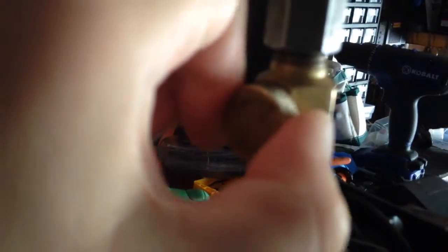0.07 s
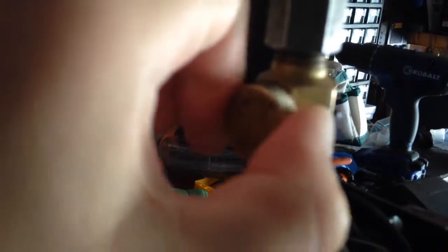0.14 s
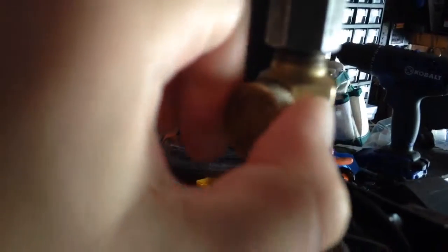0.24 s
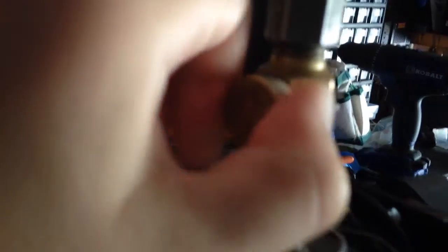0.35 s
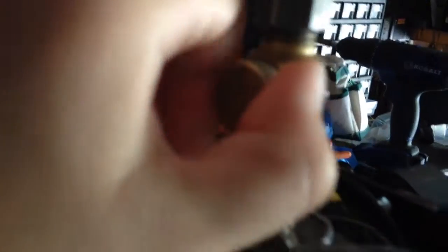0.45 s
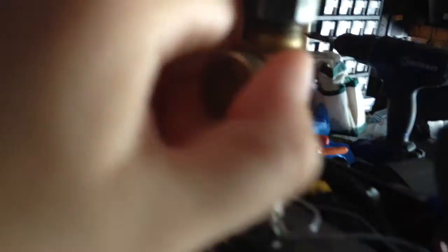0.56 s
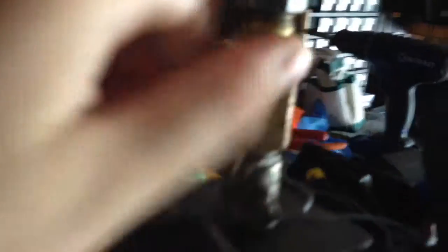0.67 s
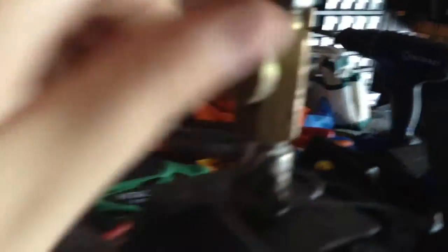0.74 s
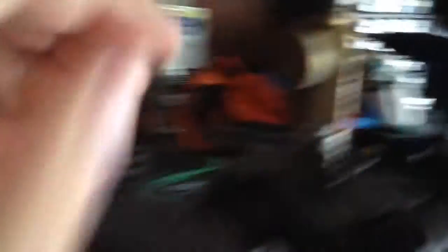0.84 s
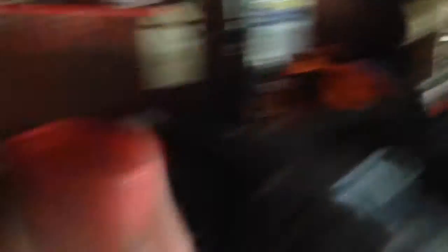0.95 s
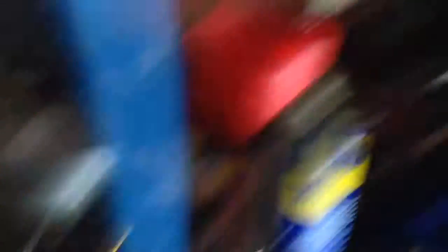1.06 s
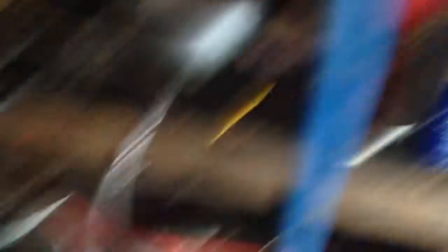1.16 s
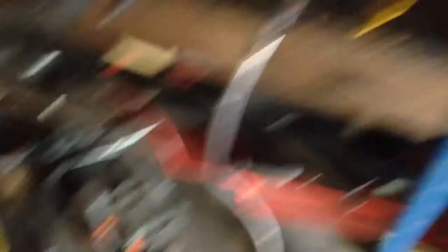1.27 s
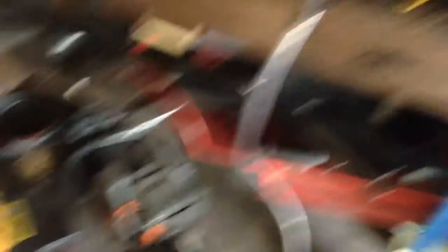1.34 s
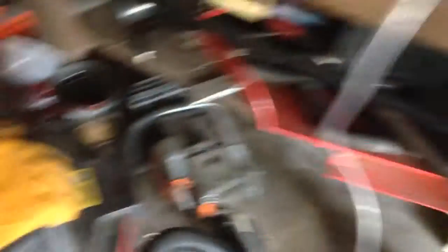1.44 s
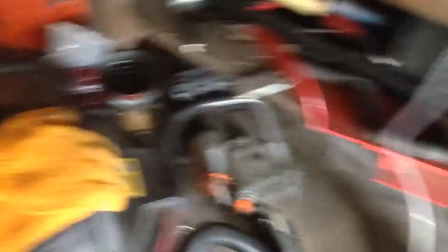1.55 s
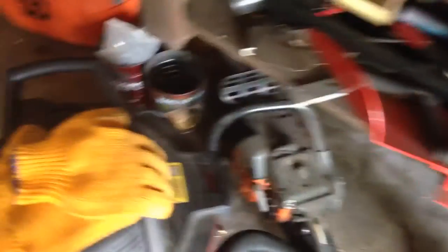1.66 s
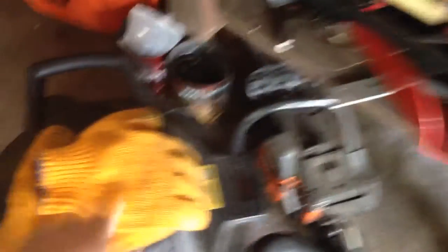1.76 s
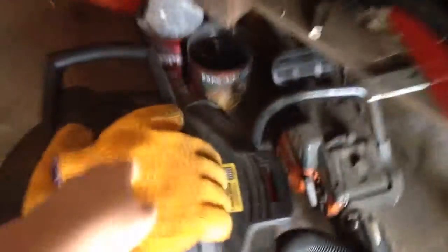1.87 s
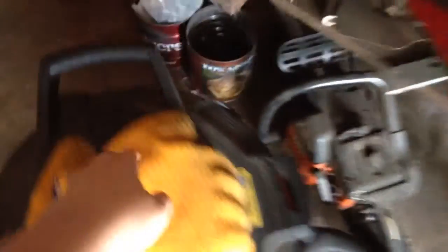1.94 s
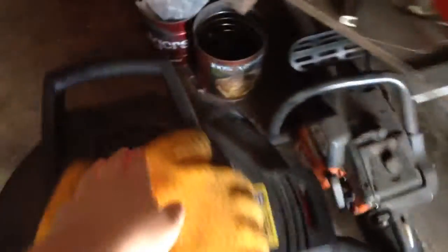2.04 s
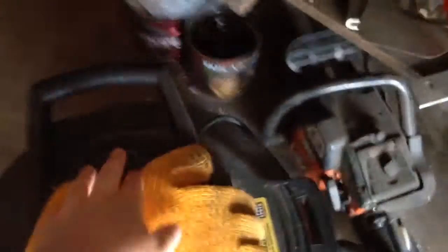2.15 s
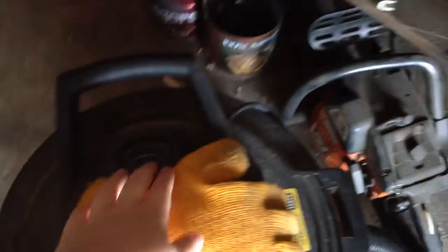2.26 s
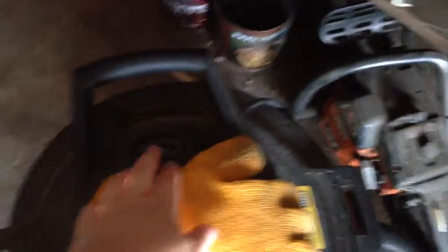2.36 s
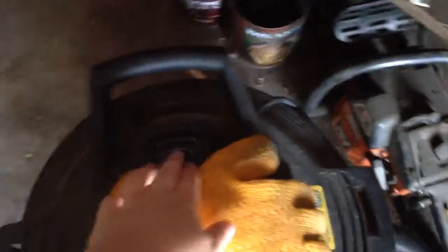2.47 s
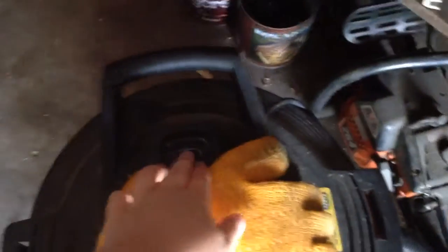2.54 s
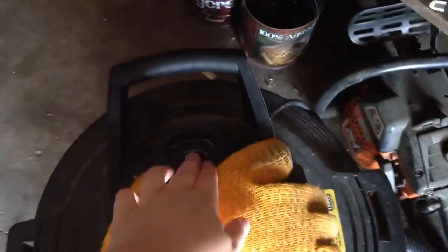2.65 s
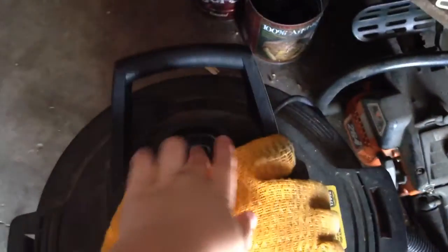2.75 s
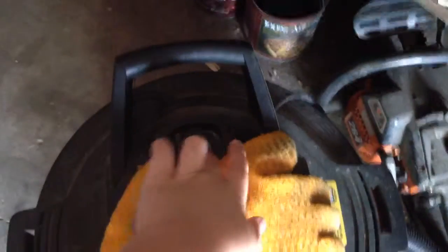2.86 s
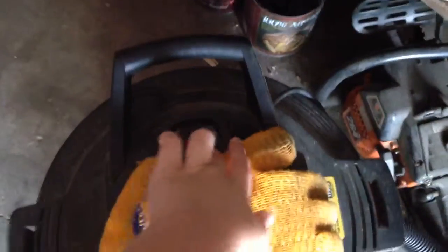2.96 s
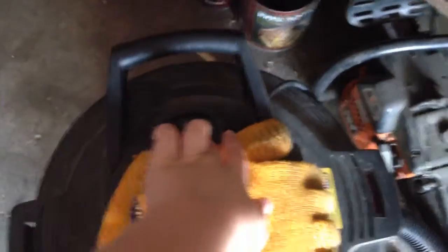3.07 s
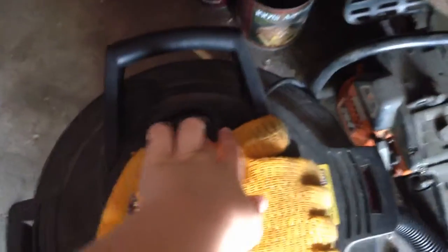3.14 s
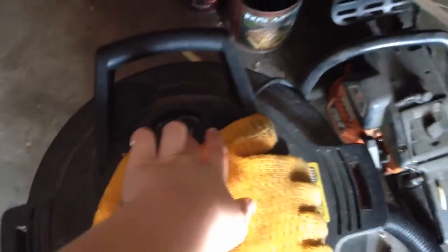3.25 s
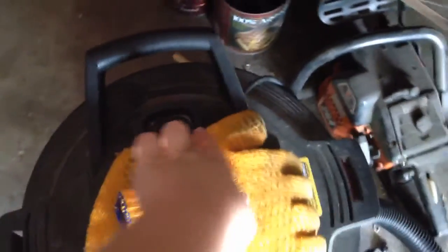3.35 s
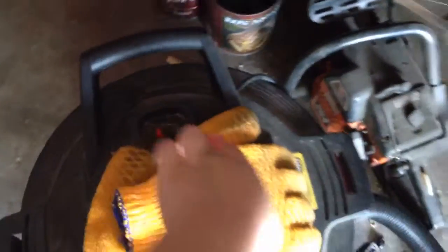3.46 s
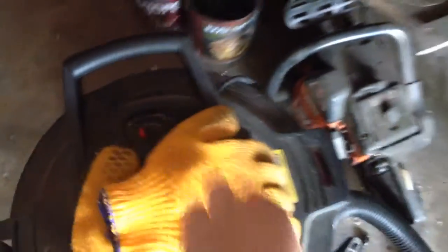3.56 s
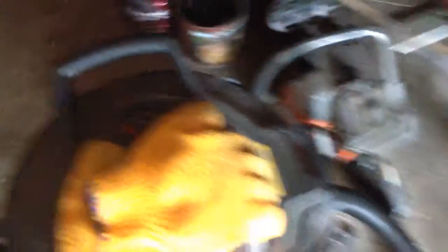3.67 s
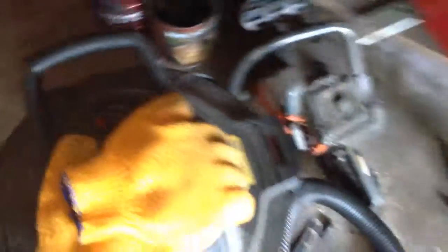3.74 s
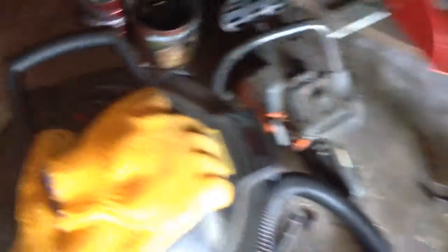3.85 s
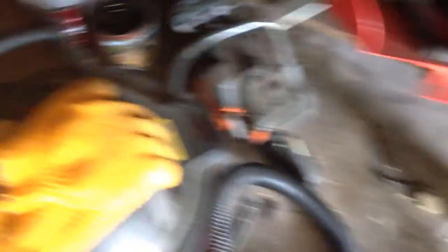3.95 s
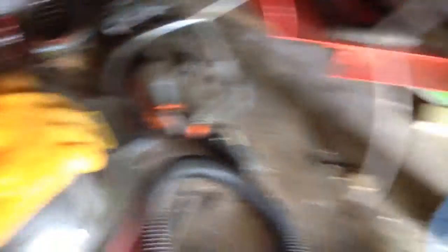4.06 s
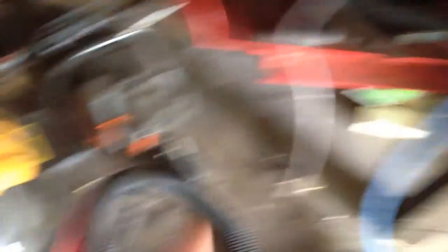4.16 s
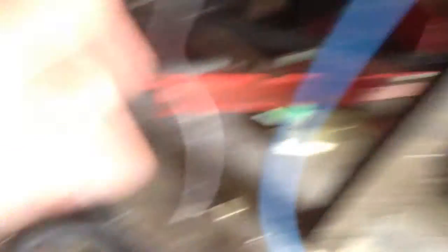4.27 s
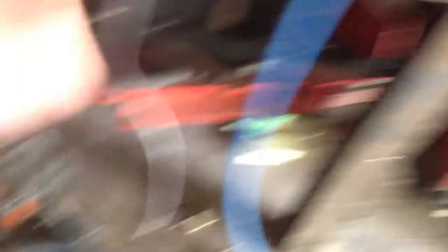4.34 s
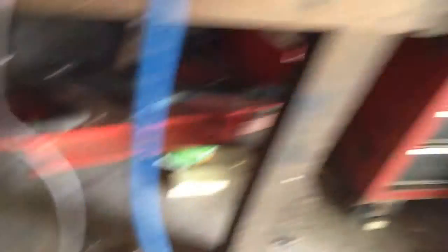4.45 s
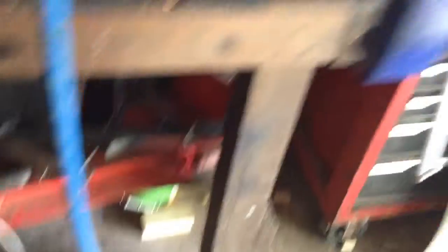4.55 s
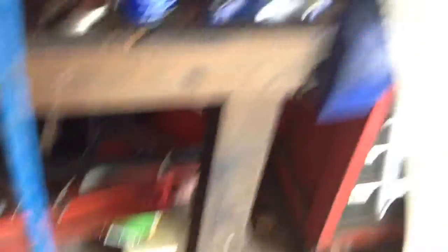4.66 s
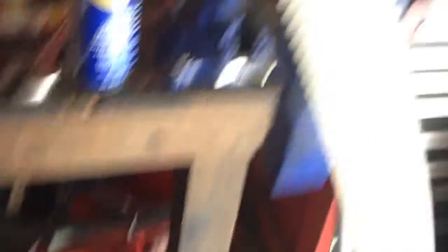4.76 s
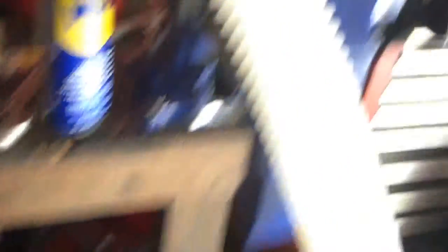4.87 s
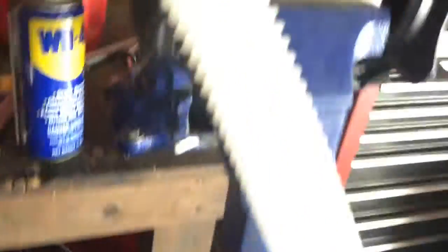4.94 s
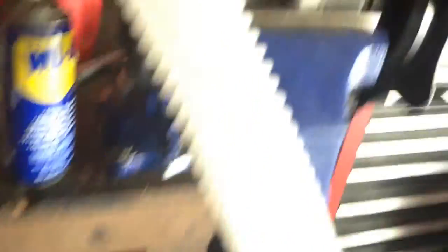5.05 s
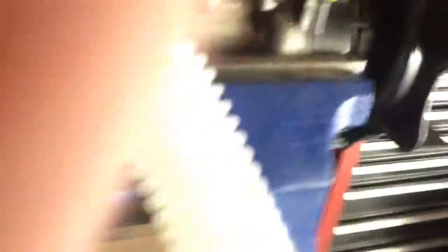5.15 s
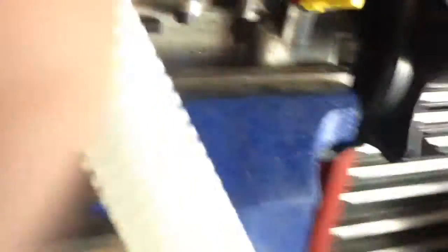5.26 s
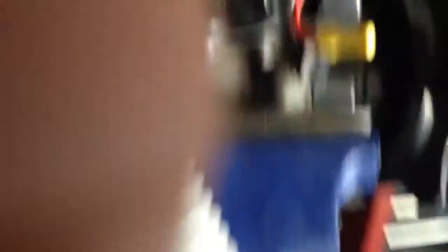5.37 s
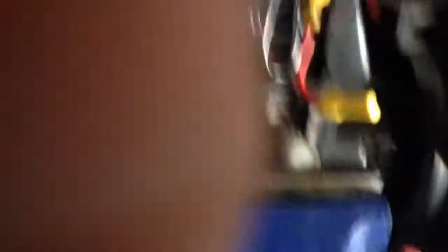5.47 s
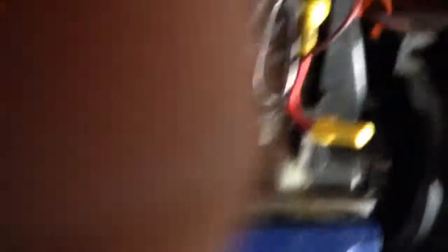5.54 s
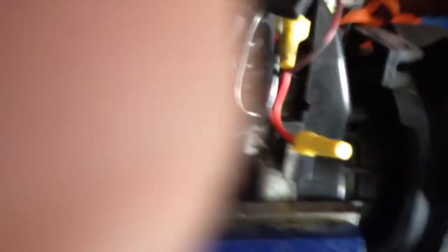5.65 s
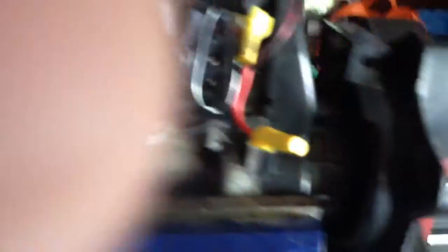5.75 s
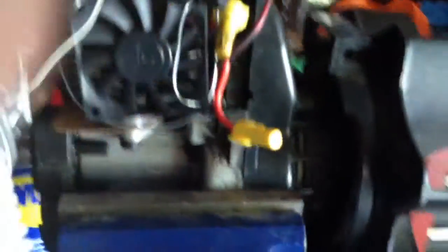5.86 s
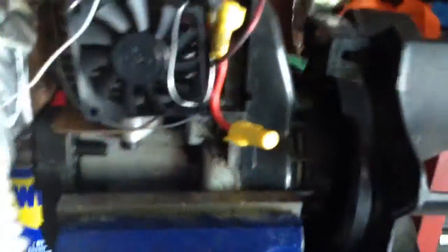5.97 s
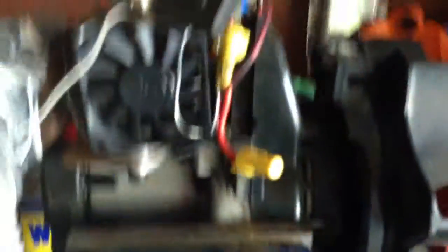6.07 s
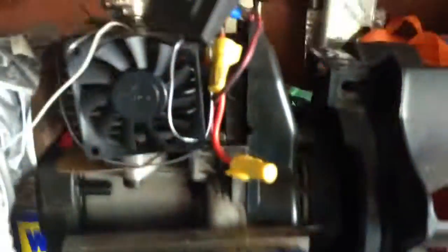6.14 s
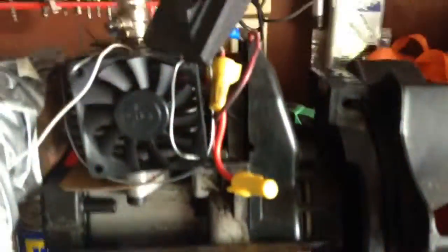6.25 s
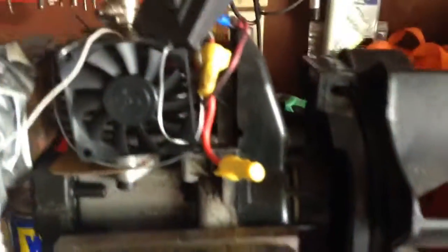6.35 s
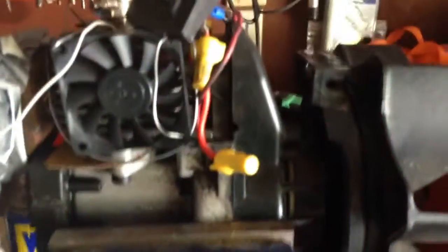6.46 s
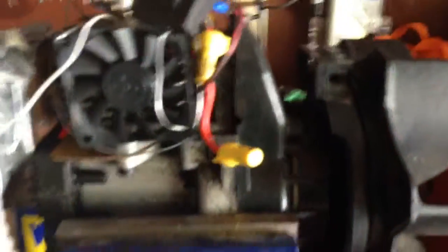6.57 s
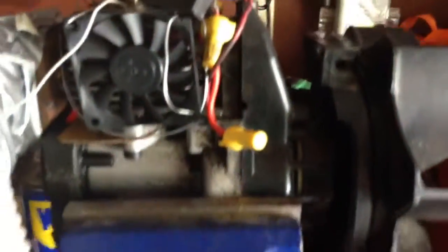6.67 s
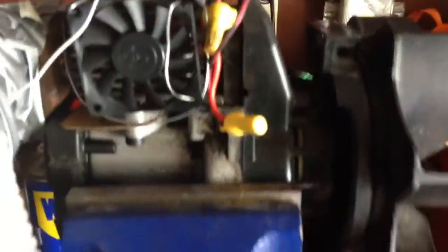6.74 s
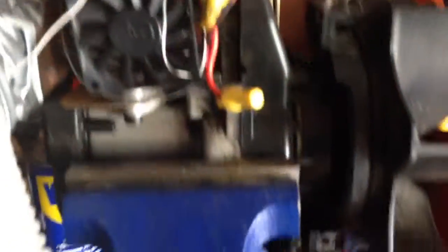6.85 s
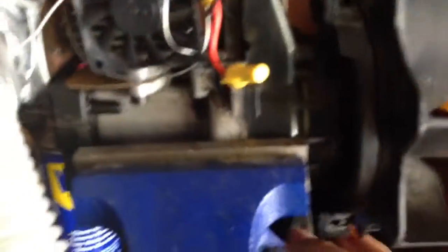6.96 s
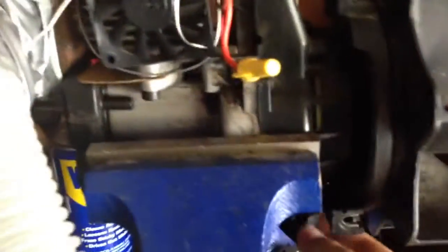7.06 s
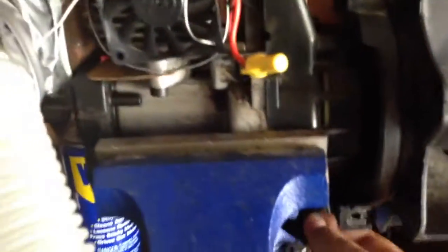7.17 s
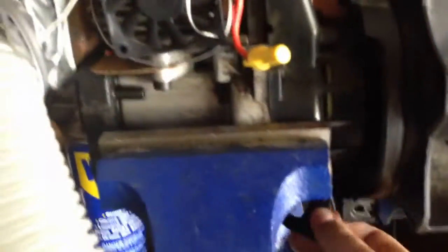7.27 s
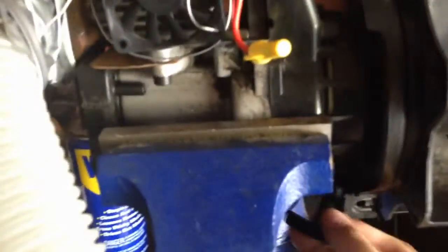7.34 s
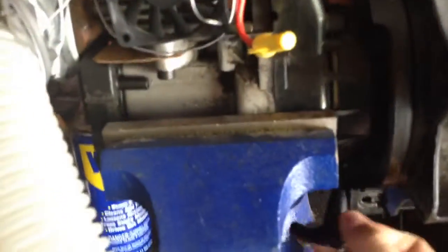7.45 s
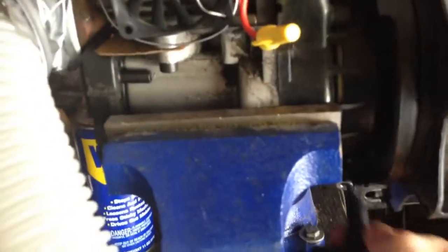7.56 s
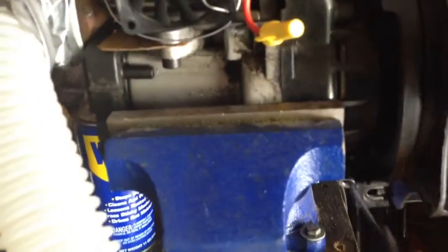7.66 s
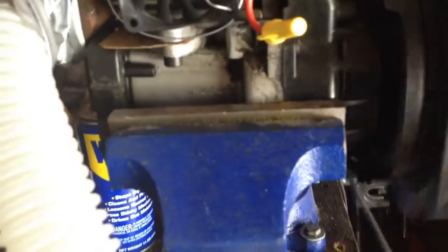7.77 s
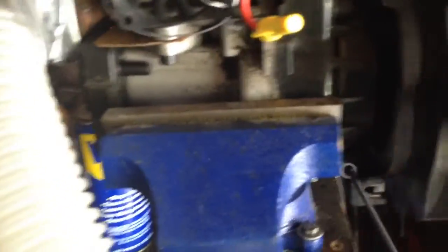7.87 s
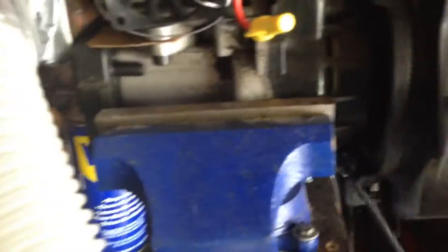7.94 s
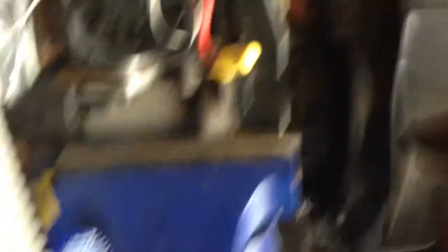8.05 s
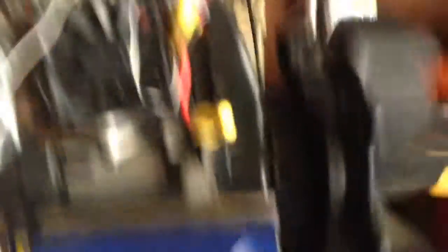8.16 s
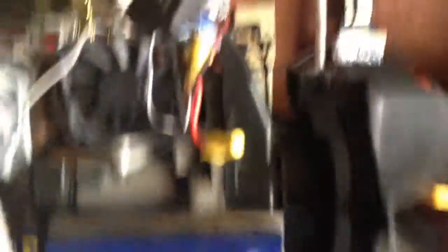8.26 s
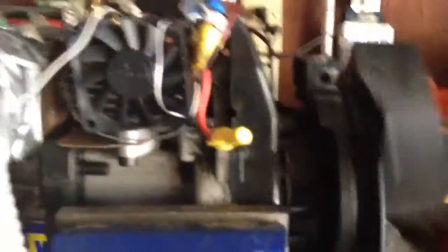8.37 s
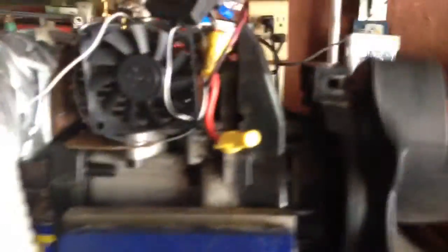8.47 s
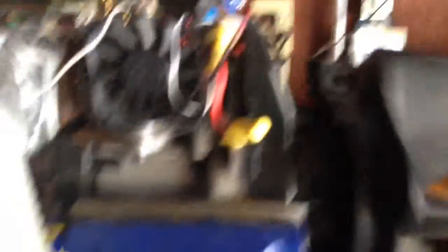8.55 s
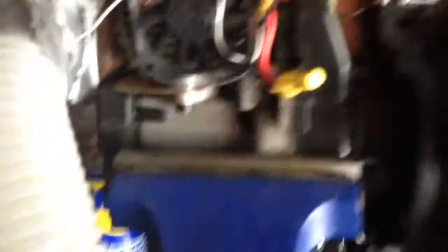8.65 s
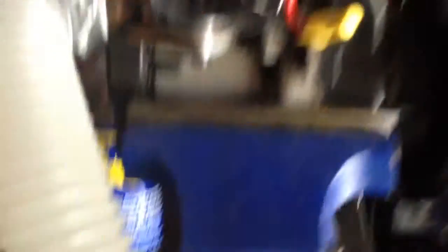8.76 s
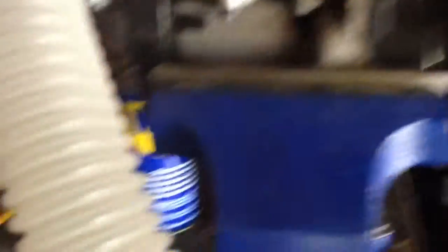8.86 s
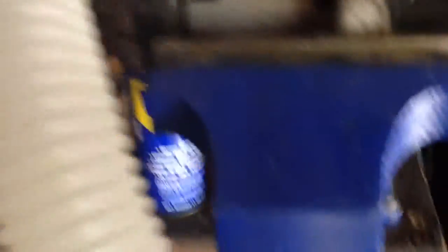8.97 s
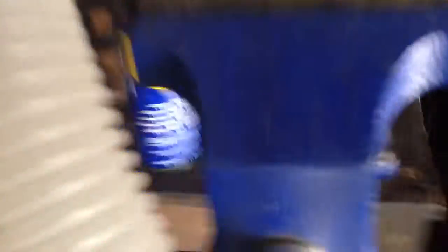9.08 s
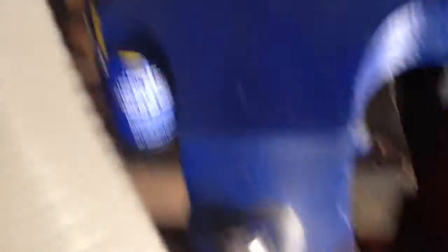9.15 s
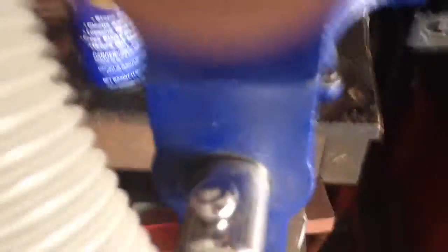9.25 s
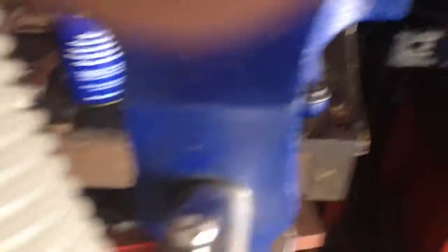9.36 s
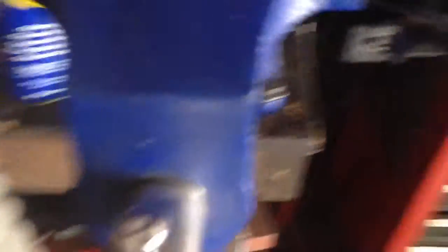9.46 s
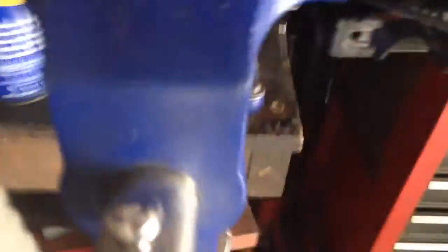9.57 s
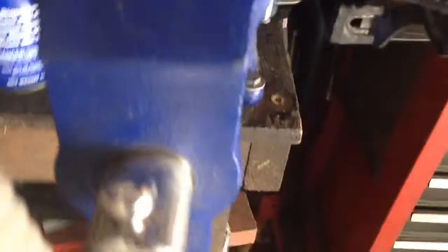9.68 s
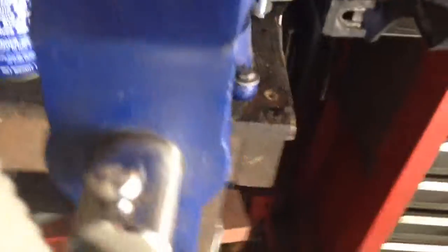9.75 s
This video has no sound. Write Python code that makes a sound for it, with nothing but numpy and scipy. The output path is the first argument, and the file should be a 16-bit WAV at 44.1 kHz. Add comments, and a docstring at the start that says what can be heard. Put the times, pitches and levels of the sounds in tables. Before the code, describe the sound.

In a workshop, a close handheld microphone catches compressed air hissing at a brass valve, duller as it turns away with soft bumps and a brief whistle. A hard switch click starts a shop vacuum, whose motor glides quickly up to a steady whine with rushing air. Later, at the bench, a small air engine fires five rapid sharp puffs while the vacuum keeps running.

```python
"""Workshop air and vacuum

Compressed air hisses at a brass valve, as coloured noise and ringing bands, and fades as the hand-held
microphone turns away. A switch snaps and a shop vacuum spins up: gliding sines make its motor's whine,
over bands of noise for its drum, hose and exhaust. At the bench a small air-driven engine gives five
sharp puffs, each a noise burst with a low pulse. A low machine hum and soft bumps of the hand lie beneath."""
import sys
import numpy as np
from scipy import signal
from scipy.fft import rfft, irfft, next_fast_len
from scipy.io import wavfile
from scipy.ndimage import uniform_filter1d, map_coordinates

SR = 44100
rng = np.random.default_rng(int(sys.argv[2]) if len(sys.argv) > 2 else 0)


def waveform_to_disk(signal):
    """Save audio, clipped to [-1, 1], as 16-bit WAV at the path in sys.argv[1]."""
    frames = np.transpose(np.atleast_2d(signal))
    scaled = np.clip(frames, -1, 1) * 32767
    samples = np.round(scaled).astype(np.int16)
    wavfile.write(sys.argv[1], SR, samples)


N = 432621

# Colour of the valve's jet. Each row: frequency in Hz, relative density in dB per Hz.
JET_COLOUR = [(40, -19), (130, -11.5), (250, -5), (430, 0), (650, -0.5), (950, 2), (1400, -4.5),
              (1850, -11.5), (2250, -8), (2750, -1.5), (3050, -7.5), (3400, -9.5), (3800, -15), (5000, -30)]
# Colour of its upper sizzle. Each row: frequency in Hz, relative density in dB per Hz.
SIZZLE_COLOUR = [(2600, -30), (3950, 2), (4450, 5), (4800, -3), (5150, 1.5), (5550, 3), (5850, 0),
                 (6200, 2), (6650, -7.5), (8400, -3.5), (9400, -9), (10700, -1), (11300, -9), (15500, -14)]
# Resonances of the valve. Each row: frequency in Hz, width in Hz, relative level in dB.
VALVE_RESONANCES = [(10860, 600, -13), (12350, 220, -16), (13500, 320, -9), (15100, 350, -1)]
# Hiss returned by the shop. Each row: frequency in Hz, relative density in dB per Hz.
SHOP_COLOUR = [(600, -13), (1300, -7), (1900, 4), (2700, -1), (4000, -5), (8000, -9), (15000, -23)]
# Roar in the vacuum's drum. Each row: frequency in Hz, relative density in dB per Hz.
DRUM_COLOUR = [(25, -60), (100, -30), (165, -21), (230, -9.5), (400, 2), (620, -1.5), (790, 1.5),
               (1000, 1.5), (1250, -4), (1450, 0), (1650, -4.5), (2100, 0), (2700, -2), (4500, -14),
               (9000, -38)]
# Hollow resonances of the drum. Each row: frequency in Hz, width in Hz, relative level in dB.
DRUM_RESONANCES = [(266, 95, 0.61), (1000, 130, 2), (1440, 180, 0)]
# Rush of the exhaust. Each row: frequency in Hz, relative density in dB per Hz.
RUSH_COLOUR = [(2000, -29.5), (3800, -11.5), (4350, -1.5), (5100, -2.5), (6500, 1), (8200, 2), (9800, -2.5),
               (12000, -21), (16000, -32)]
# Top fizz of the exhaust. Each row: frequency in Hz, relative density in dB per Hz.
FIZZ_COLOUR = [(7000, -30), (10500, -0.5), (12500, 0), (14000, -0.5), (15300, -3)]
# The vacuum's low rumble. Each row: frequency in Hz, relative density in dB per Hz.
RUMBLE_COLOUR = [(20, -22), (40, -12), (55, -3), (110, 2), (160, -3), (400, -25), (1500, -58)]
# Resonances of the switch and its housing. Each row: frequency in Hz, relative level in dB, t60 in seconds.
HOUSING_RESONANCES = [(355, -23, 0.25), (725, -26, 0.069), (970, -21, 0.081), (1430, -14, 0.032),
                      (1810, -13, 0.038), (2290, -7, .008), (3160, -3.5, 0.012), (4600, -18, .01),
                      (6500, -11, .008)]
# Crack of the switch. Each row: frequency in Hz, relative density in dB per Hz.
CRACK_COLOUR = [(40, -45), (100, -24), (700, -11), (1600, -1), (3500, 1), (6500, -4), (9000, -10),
                (15000, -12)]
# The engine's exhaust. Each row: start in seconds, relative strength of the blast in dB,
# relative strength of the low pulse in dB.
ENGINE_PUFFS = [(7.932, -15, -22.5), (8.0717, -12.5, -22.5), (8.2059, -11.5, -23), (8.3466, -12, -26),
                (8.4987, -15.5, -35)]
# Air of a puff. Each row: frequency in Hz, relative density in dB per Hz.
BURST_COLOUR = [(200, -12), (1200, -2.0), (2500, 2.0), (4300, -1.5), (7000, -0.5), (10000, 1.0),
                (15000, -6)]
# Boom of the bench. Each row: frequency in Hz, width in Hz, relative level in dB.
BENCH_RESONANCES = [(195, 68, 0), (256, 74, -6)]
# Decay of the workshop's tail. Each row: frequency in Hz, t60 in seconds.
ROOM_DECAY = [(150, .3), (2000, 0.19), (12000, 0.035)]
# Overtones of the rotor. Each row: multiple of its speed, nominal full-speed level in dB rms,
# extra in dB that dies away after the switch.
ROTOR_OVERTONES = [(2, -70, 51), (3, -68, 37), (6, -57, 0), (7, -57.5, 33), (14, -46, 3)]
# Soft bumps of the hand on the microphone. Each row: centre in seconds, peak level in dB.
HAND_BUMPS = [(1.11, -49), (1.27, -51), (4.21, -59), (4.33, -55)]
# Colour of the bumps. Each row: frequency in Hz, relative density in dB per Hz.
BUMP_COLOUR = [(20, -12), (55, 5), (100, -2), (250, -25), (1000, -70)]
# The hiss's echo off the bench. Each row: time in seconds, lag in ms, share of the direct sound.
BENCH_REFLECTION = [(1, 0.58, .27), (1.27, .56, 0.36), (1.55, 0.42, .1), (2, 0.43, .24)]
# The vacuum's echo off the floor. Each row: time in seconds, lag in ms, share of the direct sound.
FLOOR_REFLECTION = [(3.7, 2.6, .12), (5, 4.6, 0.077), (8.5, 4.8, 0.082), (9.8, 4.3, 0.11)]
# Loud spots of the hum that the microphone passes. Each row: centre in seconds, half width in seconds,
# gain in dB.
HUM_LOUD_SPOTS = [(.35, .45, 11), (1.6, .35, 12), (2.82, 0.56, 14)]
# Whine over time, before speed and resonance act; it dips briefly at the puffs.
# Each row: time in seconds, level in dB rms.
WHINE_OVER_TIME = [(3.3, -34.5), (4.12, -33), (4.37, -37), (5.25, -26.8), (7.9, -26.8), (8.3, -28),
                   (9.2, -26.5), (9.8, -27.7)]
# Exhaust over time, read against BENCH_DB: it follows nearness, and dips briefly at the puffs.
# Each row: time in seconds, level in dB.
EXHAUST_OVER_TIME = [(3.25, -27), (3.69, -23.5), (3.91, -23.5), (4.34, -26.5), (5.24, -27), (5.42, -28),
                     (5.86, -29), (7.8, -28), (8.27, -30), (8.99, -27.5), (9.3, -28), (9.81, -27)]
# Nulls of the room's standing waves in the gliding whine. Each row: centre in seconds, depth in dB.
WHINE_NULLS = [(3.092, 4), (3.155, 4), (3.28, 4), (3.405, 6.5), (3.595, 10), (3.845, 4)]

TOP_HZ = 15330  # band limit of the sound
TURN_AWAY_S, TURN_EASE_S = 1.37, 0.17  # the microphone turns from the valve: when, how gradually
LEAVE_LID_S, LEAVE_EASE_S = 4.194, 0.14  # it rises from the vacuum's lid to the bench
HAND_S, HAND_WIDTH_S = 5.56, 0.39  # a hand passes close by the microphone
BENCH_DB = -28  # exhaust level at the bench
SWITCH_S, SPIN_DELAY_S = 2.8913, 0.024  # the vacuum's switch; the wait before the rotor moves
TOP_SPEED = 577.7  # turns a second
SPIN_UP_S, SETTLE_S, SETTLE_SHARE = 0.1695, 0.512, 0.229  # a fast rise, then a slow creep
FULL_FLOW_SPEED = 330  # turns a second at which the fan's air is fully up
WHINE_ONSET_SPEED = 267  # turns a second below which the whine fades out
BOOM_HZ, BOOM_WIDTH_HZ, BOOM_DB = 398, 160, 20  # the drum's resonance, swept through by the whine
NULL_WIDTH_S, NULL_WIDENING = 0.011, 0.032  # first null's half width; seconds wider per second after it
HOSE_HZ, HOSE_WANDER_HZ = 3484, 44.97  # the ribbed hose's note and its drift
PASS_HOSE_S, PASS_WIDTH_S, PASS_DB, PASS_SAG_HZ = 4.53, 0.2, 6, 230.1  # near the hose it swells and sags
FLARE_S, FLARE_ATTACK_S, FLARE_FALL_DB_PER_S = 1.07, 0.023, 45  # the air line's rising whistle
FLARE_HZ, FLARE_RISE_HZ_PER_S = 3610, 2900


def amp(db):
    """Decibels to gain."""
    return 10 ** (np.asarray(db) / 20)


def unit(x):
    """x at rms 1."""
    return x / np.sqrt(np.mean(x ** 2) + 1e-20)


def clock():
    """The time of every sample in seconds."""
    return np.arange(N) / SR


def along(points, hz):
    """(Hz, value) points read on a log frequency axis."""
    f, v = np.transpose(points)
    return np.interp(np.log(hz + 1), np.log(f + 1), v)


def curves(rows):
    """One value per sample for each column after the time."""
    s, *cols = np.transpose(rows)
    return [np.interp(clock(), s, c) for c in cols]


def wobble(rate):
    """A smooth random curve, rate knots a second."""
    knots = rng.standard_normal(int(N * rate / SR) + 4)
    return map_coordinates(knots, [clock() * rate])


def swell(s, width_s):
    """A smooth bump from 0 to 1 and back, centred on s."""
    return np.exp(-((clock() - s) / width_s) ** 2)


def ease(s, width_s):
    """A smooth step from 0 to 1, half way at s."""
    return 0.5 + 0.5 * np.tanh((clock() - s) / (2 * width_s))


def filtered(x, response):
    """x with its spectrum multiplied by a response of frequency."""
    m = next_fast_len(N + SR // 2)
    gain = response(np.fft.rfftfreq(m, 1 / SR))
    return irfft(rfft(x, m) * gain, m)[..., :N]


def turbulence(patchy_db):
    """Moving air as white noise with drifting patches of gain across time and frequency."""
    z = signal.stft(rng.standard_normal(N), nperseg=1024)[2]
    across_hz = uniform_filter1d(rng.standard_normal(z.shape), size=5, axis=0)
    patches = unit(uniform_filter1d(across_hz, size=18, axis=1))
    return signal.istft(z * amp(patchy_db * patches), nperseg=1024)[1][:N]


def flow(spectrum, patchy_db):
    """Turbulence of a given colour, rms 1."""
    return unit(filtered(turbulence(patchy_db), lambda hz: amp(along(spectrum, hz))))


def blown(modes, patchy_db):
    """Turbulence ringing in steep-sided resonances, rms 1."""
    def gain(hz):
        return sum(amp(db) / (1 + ((hz - fc) / (width / 2)) ** 2) for fc, width, db in modes)
    return unit(filtered(turbulence(patchy_db), gain))


def singing(level_db, centre_hz, width_hz):
    """A narrow band of turbulence, shifted up to a centre and level that may move."""
    def spread(hz):
        return 1 / (1 + (2 * hz / width_hz) ** 3)
    in_phase = unit(filtered(turbulence(1), spread))
    quadrature = unit(filtered(turbulence(1), spread))
    carrier = np.exp(2j * np.pi * np.cumsum(centre_hz + np.zeros(N)) / SR)
    return amp(level_db) * np.real((in_phase + 1j * quadrature) * carrier)


def echoed(x, path):
    """x plus one reflection whose lag and share change as the microphone moves."""
    lag_ms, share = curves(path)
    late = np.arange(N) - lag_ms * SR / 1000
    reflection = share * map_coordinates(x, [late], order=3)
    return (x + reflection) / np.sqrt(1 + share ** 2)


def room(x, wet_db):
    """x with the workshop's short tail of decaying noise, the treble dying first."""
    hz, t, z = signal.stft(rng.standard_normal(SR // 2), SR, nperseg=256)
    decay = amp(-60 * t / along(ROOM_DECAY, hz)[:, None])
    tail = signal.istft(z * decay, SR, nperseg=256)[1]
    wet = signal.fftconvolve(x, tail / np.linalg.norm(tail))[:N]
    return (x + amp(wet_db) * wet) / np.sqrt(1 + amp(wet_db) ** 2)


def hum():
    """A low machine hum, a slightly unsteady sine, is louder in some spots of the shop than in others."""
    level_db = -64 + sum(db * swell(s, width_s) for s, width_s, db in HUM_LOUD_SPOTS)
    phase = 2 * np.pi * 66.5 * clock() + 0.12 * wobble(4.3)
    return amp(level_db + 0.7 * wobble(5)) * np.sin(phase)


def handling():
    """The hand bumps the microphone softly, as short swells of low noise."""
    bumps = sum(amp(db) * swell(s, width_s=0.035) for s, db in HAND_BUMPS)
    return bumps * flow(BUMP_COLOUR, patchy_db=1)


def air_line(away):
    """Air sings in the line, lower after the turn, and flares in one rising whistle."""
    steady = singing(-47 - 3.6 * away, 4000 - 480 * away, width_hz=710)
    t = np.clip(clock() - FLARE_S, -0.1, 2)
    flare_db = -33.7 - FLARE_FALL_DB_PER_S * np.maximum(t, 0)
    flare = singing(flare_db, FLARE_HZ + FLARE_RISE_HZ_PER_S * t, width_hz=650)
    return steady + ease(FLARE_S, FLARE_ATTACK_S) * flare


def leak():
    """Air escaping at the valve hisses and rings it; turning away dulls it, the high ringing most."""
    away = ease(TURN_AWAY_S, TURN_EASE_S)
    dip = swell(0.98, width_s=0.1)
    # The jet swells again for a moment after the turn.
    jet_db = -39.3 - 14 * away + 5.5 * swell(2.36, width_s=0.2)
    sizzle_db = -38.5 - 15 * away - 2 * dip
    ringing_db = -36.5 - 18 * away - 5.5 * dip
    hiss = amp(jet_db) * flow(JET_COLOUR, patchy_db=1)
    hiss += amp(sizzle_db) * flow(SIZZLE_COLOUR, patchy_db=2.5)
    hiss += amp(ringing_db) * blown(VALVE_RESONANCES, patchy_db=-1.5)
    # Off the jet's axis the hiss comes back from the shop, broad and even, most in mid-turn.
    shop_db = -55.5 + 11 * swell(1.45, width_s=0.29)
    hiss += away * amp(shop_db) * flow(SHOP_COLOUR, patchy_db=3.5)
    return air_line(away) + echoed(hiss, BENCH_REFLECTION)


def switch():
    """The rocker snaps over in a noise crack and rings the plastic housing as decaying sines."""
    t = np.maximum(clock() - SWITCH_S, 0)
    ring = np.zeros(N)
    for k, (hz, db, t60) in enumerate(HOUSING_RESONANCES):
        ring += (-1) ** k * amp(db - 60 * t / t60) * np.sin(2 * np.pi * hz * t)
    # A very short snap with a longer, weaker trail.
    snap = (t > 0) * (amp(-2 - 60 * t / 0.0055) + amp(-14.0 - 60 * t / 0.057))
    crack = snap * flow(CRACK_COLOUR, patchy_db=3)
    return room(amp(-8.5) * (crack + ring), wet_db=-15.5)


def puffs():
    """Each time the engine's port opens, air bursts out and a low pressure pulse follows."""
    blast, thump, boom = np.zeros((3, N))
    for s, blast_db, thump_db in ENGINE_PUFFS:
        t = clock() - s
        from_peak = np.abs((t - 0.0024) / 0.0034)
        blast += amp(blast_db) * np.exp(-np.minimum(from_peak, 10) ** 3)
        u = np.clip((t - 0.007) / 0.0033, -10, 10)
        thump += amp(thump_db - 2.5) * (1 - 2 * u ** 2) * np.exp(-u ** 2)
        # The pulse leaves the bench booming briefly.
        after = np.maximum(t - 0.008, 0)
        boom += (after > 0) * amp(thump_db - 13 - 60 * after / 0.28)
    burst = blast * flow(BURST_COLOUR, patchy_db=-1.5)
    return room(burst, wet_db=-7.5) + thump + boom * blown(BENCH_RESONANCES, patchy_db=1.5)


def rotor_speed():
    """Turns a second: after the switch the rotor closes in on its top speed, fast and then slowly."""
    t = np.maximum(clock() - SWITCH_S - SPIN_DELAY_S, 0)
    fast_gap = (1 - SETTLE_SHARE) * np.exp(-t / SPIN_UP_S)
    slow_gap = SETTLE_SHARE * np.exp(-t / SETTLE_S)
    return TOP_SPEED * (1 - fast_gap - slow_gap)


def shortfall(speed):
    """How far the fan is from full flow: 1 at rest, 0 once it is up."""
    return np.clip(1 - speed / FULL_FLOW_SPEED, 0, 1)


def suction():
    """The fan's air roars in the drum, sings in the hose and hisses out, rising with the rotor's speed."""
    slow = shortfall(rotor_speed())
    exhaust_db = curves(EXHAUST_OVER_TIME)[0] - BENCH_DB
    over_lid = 1 - ease(LEAVE_LID_S, LEAVE_EASE_S)
    hand, passing = swell(HAND_S, HAND_WIDTH_S), swell(PASS_HOSE_S, PASS_WIDTH_S)
    drum_db = -30 + 0.23 * exhaust_db + 1.84 * over_lid - 14 * slow
    rush_db = -27.8 + 0.56 * over_lid + 1.08 * exhaust_db - 35 * slow
    fizz_db = -30.5 + 1.45 * exhaust_db - 3.0 * hand - 40 * slow
    air = amp(drum_db) * flow(DRUM_COLOUR, patchy_db=1.82)
    air += amp(rush_db) * flow(RUSH_COLOUR, patchy_db=1.44)
    air += amp(fizz_db) * flow(FIZZ_COLOUR, patchy_db=1.9)
    hose_db = -30.7 - 3.9 * over_lid + PASS_DB * passing - 30 * slow + 0.96 * wobble(5)
    hose_hz = HOSE_HZ - PASS_SAG_HZ * passing + HOSE_WANDER_HZ * wobble(2.5)
    air += singing(hose_db, hose_hz, width_hz=980)
    # A higher whistle stands out over the lid and while the hand is near.
    whistle_db = -48.5 + 13 * over_lid + 17 * hand - 35 * slow
    air += singing(whistle_db, 4370 + 40 * wobble(2.5), width_hz=620)
    # Close above the lid, the drum's hollow resonances stand out.
    hollow_db = drum_db - 28 + 21.3 * over_lid - 21 * slow
    air += amp(hollow_db) * blown(DRUM_RESONANCES, patchy_db=2.0)
    # The rumble fills the shop evenly, wherever the microphone points.
    air += amp(-63.0) * flow(RUMBLE_COLOUR, patchy_db=3.0)
    running = np.clip((clock() - SWITCH_S) / 0.018, 0, 1)
    air = running * amp(0.36 * wobble(12)) * air
    return room(echoed(air, FLOOR_REFLECTION), wet_db=-15)


def whine_level(speed):
    """The whine in dB: it sets in with speed, booms at the drum's resonance, dips at nulls and wavers."""
    level_db, = curves(WHINE_OVER_TIME)
    onset_db = -95 * np.clip(1 - speed / WHINE_ONSET_SPEED, 0, 1)
    boom_db = BOOM_DB / (1 + (2 * (speed - BOOM_HZ) / BOOM_WIDTH_HZ) ** 2)
    # Later nulls last longer, as the glide slows.
    nulls_db = 0
    for s, depth_db in WHINE_NULLS:
        width_s = NULL_WIDTH_S + NULL_WIDENING * (s - WHINE_NULLS[0][0])
        nulls_db += depth_db * swell(s, width_s)
    waver_db = 1.6 * swell(3.6, width_s=0.7) * wobble(18)
    return level_db + onset_db + boom_db - nulls_db + waver_db


def start_up(speed):
    """Brushes scrape and the straining motor groans; both rise in pitch with speed and soon die away."""
    scrape = singing(-36.5, 1800 + 2.1 * speed, width_hz=500)
    groan_hz = 520 + 1.42 * speed
    # The groan is loudest as it crosses a resonance of the housing.
    groan_db = -38 + 8 / (1 + ((groan_hz - 745) / 45) ** 2)
    groan = singing(groan_db, groan_hz, width_hz=70)
    return swell(3.09, width_s=0.12) * scrape + swell(3.07, width_s=0.14) * groan


def motor():
    """The rotor shakes the drum once a turn, making the whine; mains hum in its windings fades to a trace."""
    speed = rotor_speed()
    fraction = speed / speed.max()
    whine_db = whine_level(speed)
    since = np.maximum(clock() - SWITCH_S, 0)
    turn = 2 * np.pi * np.cumsum(speed + 0.187 * wobble(5)) / SR
    # The pressure wave is slightly lopsided, so a faint octave rides on it.
    octave_gain = fraction ** 6 * amp(-20.5 + 0.81 * wobble(3.01))
    octave = octave_gain * np.sin(2 * turn + 0.1 * wobble(22))
    whine = amp(whine_db + 0.2 * wobble(14)) * (np.sin(turn + 0.025 * wobble(40)) + octave)
    # Overtones flutter in the moving air, and get a boost while the motor strains to speed up.
    strain = np.exp(-since / 0.7)
    for multiple, db, extra_db in ROTOR_OVERTONES:
        level = fraction ** 2 * amp(db + extra_db * strain + 2.1 * wobble(7.5))
        whine += level * np.sin(round(multiple) * (turn + 0.12 * wobble(25)))
    mains_hum = (amp(-47.0 - 30 * since) + amp(-69.5)) * np.sin(2 * np.pi * 120 * since)
    # The root of 2 turns sine levels into rms levels.
    return (since > 0) * (np.sqrt(2) * (whine + mains_hum) + start_up(speed))


def scene():
    """Everything reaches one microphone, heard alike in both ears."""
    mono = hum() + handling() + leak() + switch() + puffs() + suction() + motor()
    return np.array([mono, mono])


def record(dry):
    """The microphone's electronics round off the highest peaks and keep nothing above the band limit."""
    rounded = dry / (1 + np.abs(dry / 0.72) ** 6) ** (1 / 6)
    return filtered(rounded, lambda hz: hz < TOP_HZ)


dry = scene()
out = record(dry)
waveform_to_disk(out)
```